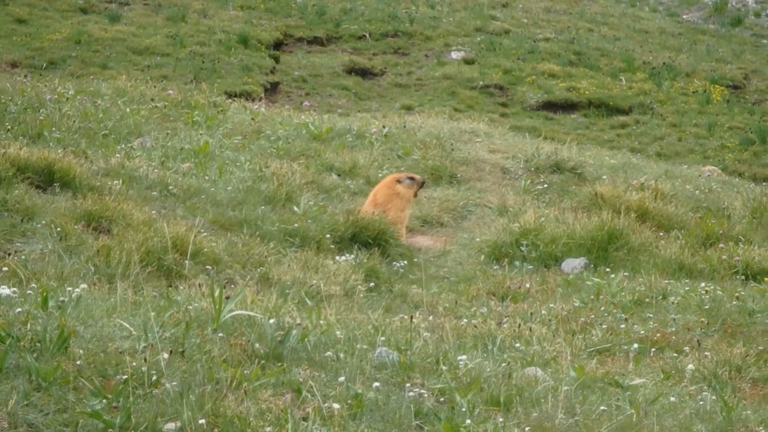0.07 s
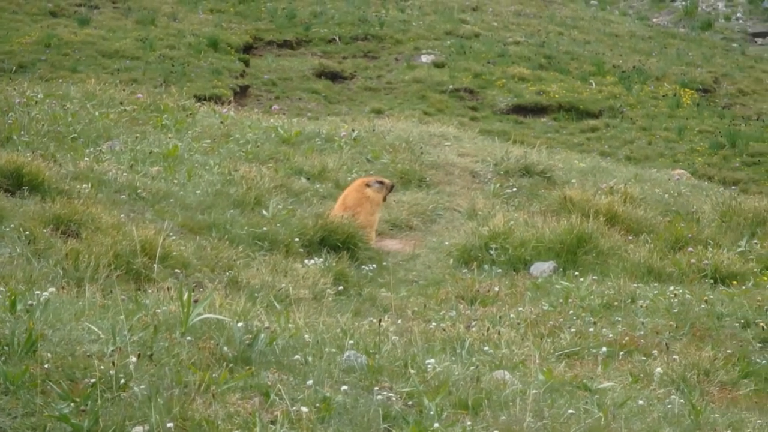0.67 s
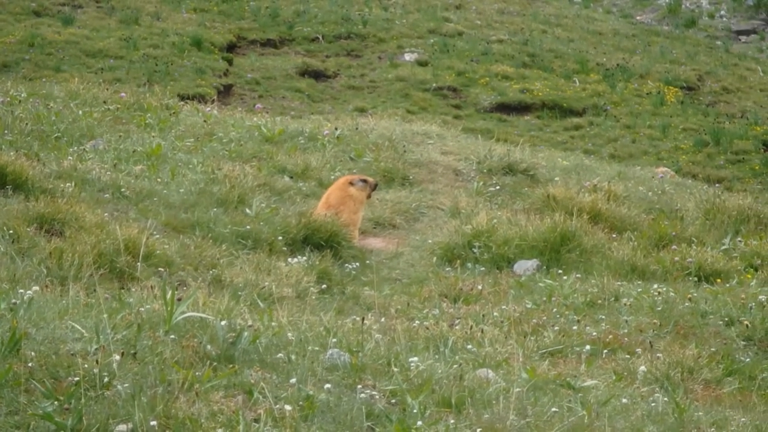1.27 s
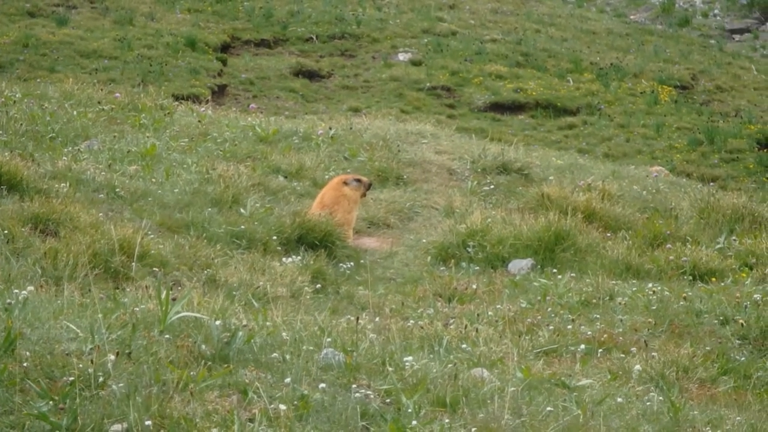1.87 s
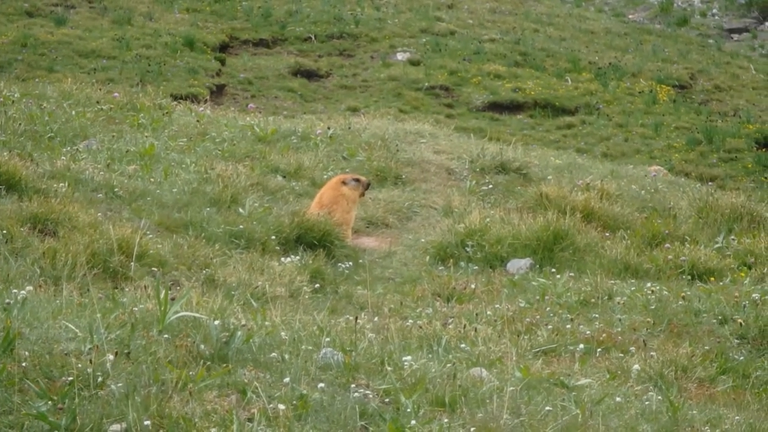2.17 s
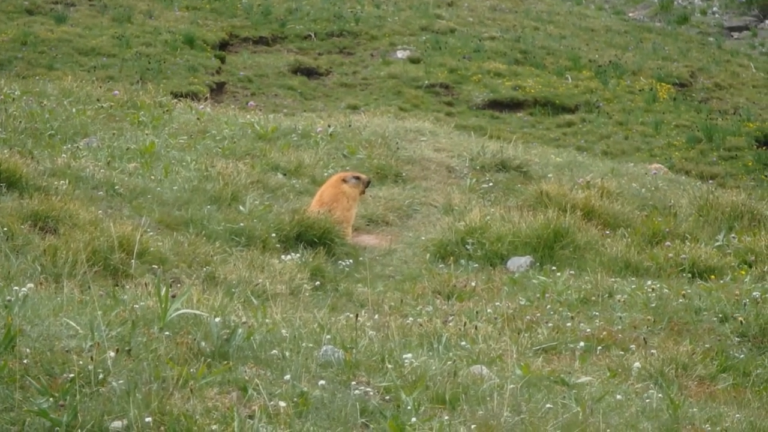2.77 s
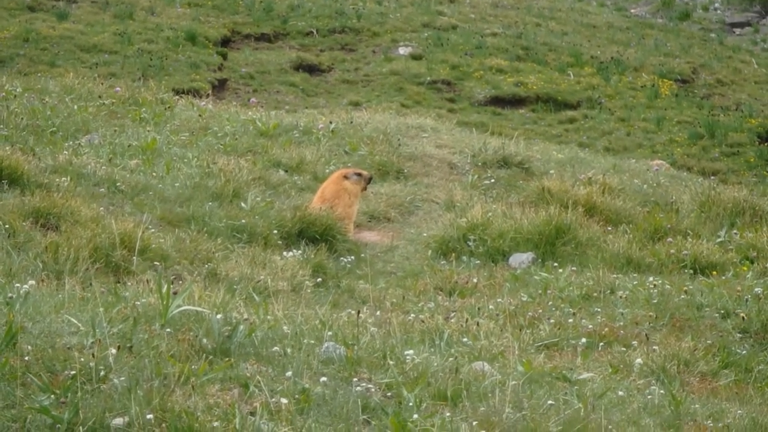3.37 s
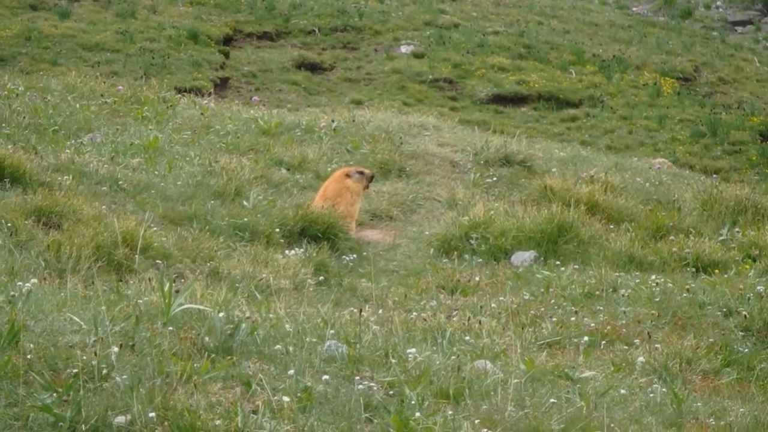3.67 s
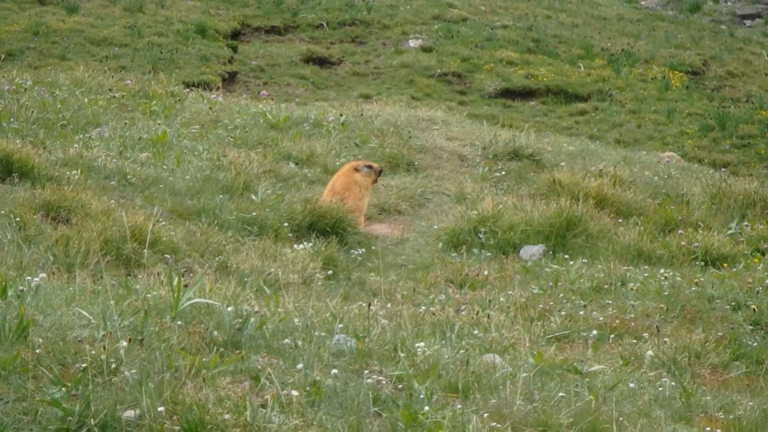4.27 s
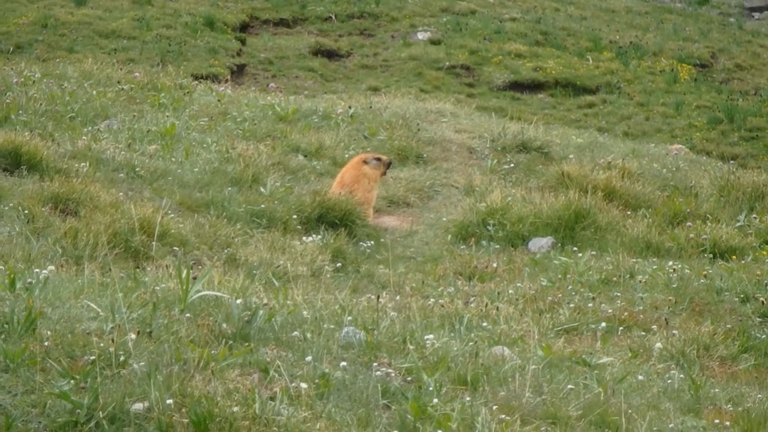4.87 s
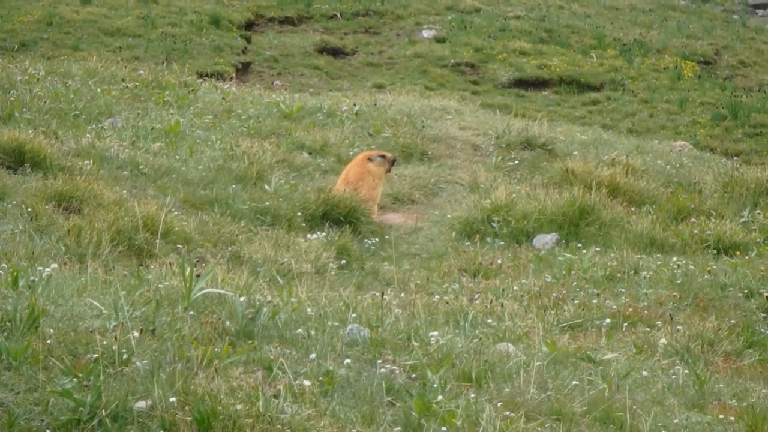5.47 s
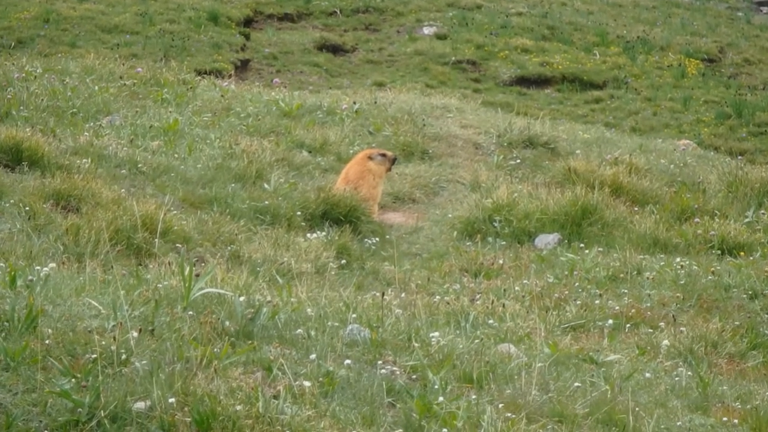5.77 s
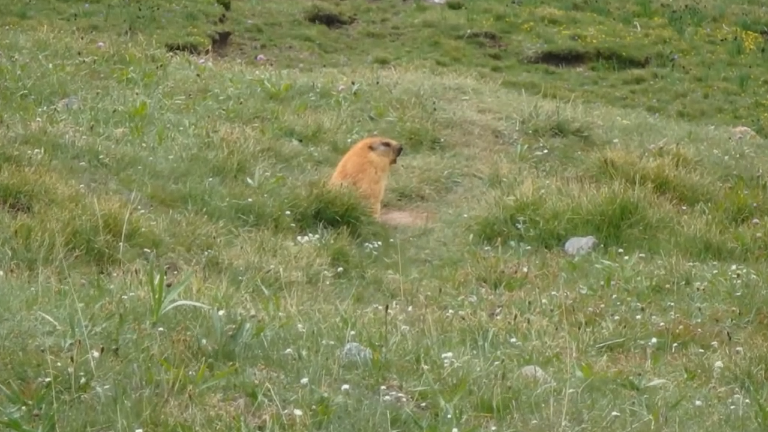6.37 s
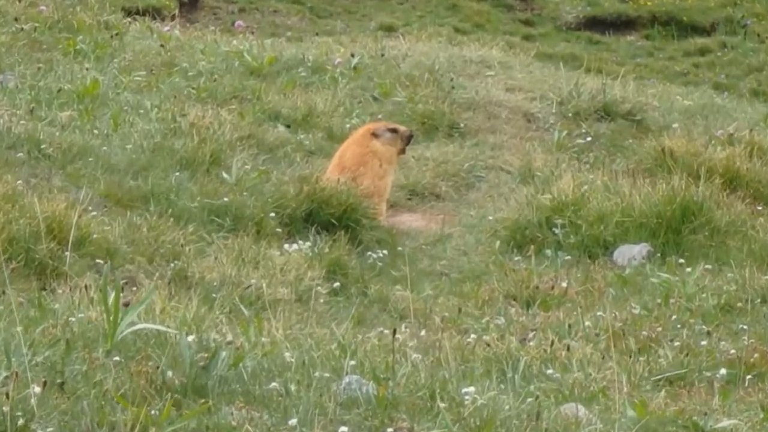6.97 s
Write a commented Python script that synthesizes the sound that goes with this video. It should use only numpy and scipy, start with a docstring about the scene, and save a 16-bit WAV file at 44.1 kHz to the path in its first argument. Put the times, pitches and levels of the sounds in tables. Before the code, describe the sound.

On an open mountain meadow, a marmot gives three loud, short alarm whistles about half a second apart, each trilled and falling, with no echo. A distant stream and a breeze then swell up from a low level. Gusts rumble and thump on the faintly hissing microphone of a small camera. Later, fingers click briefly on the case, and a far bird chirps once, very faintly.

```python
"""An open alpine meadow: a marmot gives three falling, trilled alarm whistles while a stream rushes far off.
The whistles duck a small camera's gain control, so stream and wind swell back over two seconds.
Gusts buffet the hissing microphone, the focus motor whines in short runs, fingers click on the case
and a small bird chirps once."""
import sys
import numpy as np
from scipy import signal
from scipy.fft import rfft, irfft, next_fast_len
from scipy.io import wavfile
from scipy.ndimage import uniform_filter1d, minimum_filter1d, map_coordinates

SR = 44100
rng = np.random.default_rng(int(sys.argv[2]) if len(sys.argv) > 2 else 0)


def dump(signal):
    """Clip the signal to [-1, 1] and save it as 16-bit WAV at the path in sys.argv[1]."""
    limited = np.clip(np.atleast_2d(signal).T, -1, 1)
    pcm = np.round(limited * 32767).astype(np.int16)
    wavfile.write(sys.argv[1], SR, pcm)


N = 314433
T = np.arange(N) / SR


def undb(db):
    """Decibels to gain."""
    return 10 ** (np.asarray(db) / 20)


def unit(x):
    """Scale to rms 1."""
    return x / np.sqrt(np.mean(x ** 2))


def response(curve, hz):
    """Gain of an EQ curve (f/Hz, level/dB) at the given frequencies."""
    f, db = np.transpose(curve)
    return undb(np.interp(np.log(np.maximum(hz, 1)), np.log(f), db))


def noise(curve):
    """Noise of rms 1, coloured by an EQ curve."""
    size = next_fast_len(N)
    spectrum = rfft(rng.standard_normal(size)) * response(curve, np.fft.rfftfreq(size, 1 / SR))
    return unit(irfft(spectrum, size)[:N])


def wander(rate_hz):
    """Smooth random modulation of rms 1."""
    step = max(int(SR / rate_hz), 2)
    return unit(uniform_filter1d(np.repeat(rng.standard_normal(N // step + 1), step), step)[:N])


def swell(peak_s, half_s):
    """A bell-shaped envelope of height 1."""
    return np.exp(-((T - peak_s) / half_s) ** 2 / 2)


def place(x, pan_db, lag=0):
    """Pan across the two microphone ports: left minus right in dB, the right late by lag samples."""
    late = map_coordinates(x, [np.arange(N) - lag], order=3)
    return np.array([x * undb(pan_db / 2), late * undb(-pan_db / 2)])


def call_contour(age, left_s, top_hz, sink_hz_per_s, drop_hz, sag_hz):
    """The marmot's voice starts high and hard, sinks, breaks to a lower register and runs out of breath."""
    hold_s, floor_hz = .016, 1850
    break_s, break_width_s = .056, .0051
    fade_s, fade_db = .019, -10.5
    hard_dip, soft_dip, dip_growth_per_s = .28, .087, 1.3  # pitch dip between beats, as a share
    broken = (1 + np.tanh((age - break_s) / (2 * break_width_s))) / 2
    spent = np.clip(1 - left_s / fade_s, 0, 1)
    sunk_hz = top_hz - sink_hz_per_s * np.maximum(age - hold_s, 0) - drop_hz * broken
    crest_hz = np.maximum(sunk_hz, floor_hz) - sag_hz * spent
    dip = hard_dip * (1 - broken) + soft_dip * broken + dip_growth_per_s * np.maximum(age - break_s, 0)
    return crest_hz, fade_db * spent, dip


def whistle(start, end, trill_hz, slowing, voicing):
    """A falling whistle chopped by a slowing trill; pitch and loudness arch in every beat."""
    # resonances of throat and mouth: f/Hz, gain/dB
    throat = [(1700, -28), (1950, -20.5), (2100, -13.5), (2250, -8), (2450, -6.5), (2900, 1), (3550, -4),
              (4000, -5), (4300, -7.5), (4700, -19), (5400, -11), (5900, -7), (6600, -17.5), (9000, -19)]
    note_s, attack_s, release_s = .0135, .0032, .0015
    lean, skew, jitter = .23, .033, .049
    harmonics_db, grain, rasp_db = [0, -14, -26], .14, -53
    age = np.clip(T - start, 0, end - start)
    crest_hz, effort_db, dip = call_contour(age, end - start - age, *voicing)
    beat = np.log1p(slowing * trill_hz * age) / slowing % 1
    beat_s = 1 / trill_hz + slowing * age
    # a note lasts at most note_s, so gaps open as the trill slows
    swing = np.clip((2 * beat - 1) * np.maximum(beat_s / note_s, 1), -1, 1)
    # deep beats sweep wide, crest late and are rough; shallow ones are smooth and sag
    hz = crest_hz * (1 - dip * swing ** 2 + (lean * dip - skew) * swing + jitter * dip * wander(1200))
    phase = 2 * np.pi * np.cumsum(hz) / SR
    gate = np.clip(np.minimum((T - start - .002) / attack_s, (end - T) / release_s), 0, 1)
    opening = np.abs(np.cos(np.pi / 2 * swing)) ** .88 * gate
    # harmonics bloom with the opening and slide through the resonances: the second gains as pitch sinks
    tone = 0
    for k, db in enumerate(harmonics_db, 1):
        roughness = grain * (k - 1) * wander(2000)
        envelope = undb(db) * opening ** np.sqrt(k) * response(throat, k * hz)
        tone = tone + envelope * np.sin(k * phase + roughness)
    rasp = undb(rasp_db) * opening * np.sqrt(response(throat, hz)) * rng.standard_normal(N)
    return (np.sqrt(2) * tone + rasp) * undb(effort_db + .5 * wander(300))


def marmot(level_db=7):
    """Three alarm whistles from near the centre; the open slope gives no echo."""
    # calls: start/s, end/s, opening trill rate/Hz, lengthening per beat/share,
    # opening pitch/Hz, sink/(Hz/s), drop at the voice break/Hz, final sag/Hz
    whistles = [(-.0125, 0.125, 96.9, .04, 2950, 5100, 249, 280),
                (.444, 0.611, 96.7, 0.048, 3037, 4230, 467, 20),
                (0.933, 1.118, 98, .05, 3040, 5320, 443, 50)]
    calls = sum(whistle(start, end, trill_hz, slowing, voicing)
                for start, end, trill_hz, slowing, *voicing in whistles)
    return place(calls * undb(level_db), pan_db=-3, lag=.78)


def wind(rumble_share=.48, flutter_share=.62, eddy_db=2):
    """Gusts swell out of a light breeze; eddies hit both ports partly together, and hard ones thump."""
    # deep rumble of air on the microphone: f/Hz, level/dB
    rumble_eq = [(12, -19), (22, 0), (45, 2.5), (85, 6), (125, 1.5), (170, -7.5), (300, -45), (1500, -100)]
    # low-mid flutter of the eddies: f/Hz, level/dB
    flutter_eq = [(40, -41), (90, -18.5), (140, 0), (180, 0.5), (240, -3.5), (320, -10.5), (450, -22),
                  (700, -33.5), (4000, -91)]
    # gusts: t/s, half length/s, rumble/dB, flutter/dB
    gusts = [(0.687, 0.02, -16.5, -29), (0.768, 0.042, -18.5, -23), (1.27, 0.11, -26.5, -28),
             (2.31, .04, -18, -22), (2.443, 0.043, -21, -19.5), (2.67, 0.088, -19, -31),
             (2.897, 0.049, -20.5, -49), (3.166, 0.042, -24, -36), (3.36, 0.024, -26, -33),
             (3.718, 0.075, -22.5, -25), (4.103, 0.016, -19.5, -33), (4.366, 0.061, -21, -33),
             (4.68, 0.063, -15.5, -17.5), (4.816, 0.05, -19, -23.5), (4.97, 0.093, -24, -53),
             (6.21, 0.06, -23, -24), (6.415, 0.018, -24, -30.5)]
    # single hard eddies: t/s, half length/s, level/dB, f/Hz
    buffets = [(0.735, 0.015, -16, 342), (2.308, 0.0099, -16.5, 262), (2.346, 0.0097, -23, 345),
               (2.454, 0.0069, -29, 226), (3.7, 0.0089, -18.5, 200), (4.65, 0.0044, -16.5, 281),
               (4.69, 0.0097, -9, 183), (4.762, 0.007, -18.5, 320), (4.822, 0.0075, -9.5, 210)]
    breeze = undb(1.5 * wander(6.6))
    rumble, flutter = breeze * undb(-29.5), breeze * undb(-32)
    for peak_s, half_s, rumble_db, flutter_db in gusts:
        gust = swell(peak_s, half_s)
        rumble = np.hypot(rumble, undb(rumble_db) * gust)
        flutter = np.hypot(flutter, undb(flutter_db) * gust)
    out = 0
    for envelope, eq, share in [(rumble, rumble_eq, rumble_share), (flutter, flutter_eq, flutter_share)]:
        ports = np.sqrt(share) * noise(eq) + np.sqrt(1 - share) * np.array([noise(eq), noise(eq)])
        out = out + unit(ports * undb(eddy_db * wander(45))) * envelope
    for peak_s, half_s, db, hz in buffets:
        band = signal.butter(2, [hz / 1.62, hz * 1.28], "band", fs=SR, output="sos")
        both, left, right = signal.sosfilt(band, rng.standard_normal((3, N)))
        out = out + undb(db) * swell(peak_s, half_s) * unit(both + 1.45 * np.array([left, right]))
    return out * undb([[-2.8], [1.5]])  # heavier on the right


def stream(level_db=-35, diffuse_db=-13):
    """A gently wavering bed of far water, a little to the right, with a diffuse wash around it."""
    # rushing water at a distance: f/Hz, level/dB
    water_eq = [(150, -8), (480, -5), (680, 0), (880, -0.5), (1120, -5.5), (1600, -5), (2000, -8.5),
                (2750, -8.5), (3400, -12.5), (4200, -8.5), (4620, -28.5), (5500, -24.5), (7500, -32),
                (11000, -49.5)]
    direct = place(noise(water_eq), pan_db=-5.5, lag=.34)
    wash = undb(diffuse_db) * np.array([noise(water_eq), noise(water_eq)])
    return (direct + wash) * undb(level_db + 1.17 * wander(6))


def microphone_hiss(level_db=-48.5, opposed=.13):
    """The microphone's own noise, partly out of phase between the channels."""
    # noise floor: f/Hz, level/dB
    hiss_eq = [(3000, 7.5), (7000, -2.5), (9000, -2.5), (11500, 4), (13000, 1.5), (15000, 1.5)]
    hiss = np.array([noise(hiss_eq), noise(hiss_eq)])
    return undb(level_db) * (hiss - opposed * hiss[::-1])


def focus_motor(level_db=-61, whine_hz=11000, run_s=.13, every_s=.173, ramp_s=.0037):
    """The focus motor spins in short runs, each a thin, steady whine."""
    # motor bursts: t/s, number of runs
    bursts = [(.22, 3), (1.1, 1), (1.57, 3), (2.27, 2), (2.91, 3), (3.73, 1), (4.14, 5), (5.24, 1),
              (5.65, 1), (6.125, 1), (6.595, 1), (7.07, 1)]
    starts = [start + k * every_s for start, runs in bursts for k in range(round(runs))]
    running = sum(np.clip(np.minimum(T - s, s + run_s - T) / ramp_s, 0, 1) for s in starts)
    return undb(level_db) * np.sqrt(2) * running * np.sin(2 * np.pi * whine_hz * T)


def finger_clicks(width=.45, snap=1.2, grit_db=-.5):
    """Each touch snaps, then slips grittily, ringing the camera case nearer the right port."""
    # touches: t/s, level over 4 ms/dB, decay/s, brightness/(dB/octave)
    touches = [(5.134, -39, 0.0019, 2), (5.142, -36, .002, 3), (5.151, -29.5, 0.0023, 1),
               (5.1667, -24, 0.0022, -1), (5.173, -25.5, 0.00095, 2), (5.2094, -11.5, 0.0021, -6),
               (5.2405, -29, 0.0035, -7), (5.248, -24, 0.0035, 14), (5.2522, -24.5, 0.0076, 14),
               (5.2753, -21, 0.0046, 16), (5.279, -21.5, 0.002, -10), (5.414, -32, 0.0034, 2),
               (5.47, -34, .004, 1)]
    # modes of the case: f/Hz, width/Hz, level/dB
    modes = [(1700, 450, -16), (2860, 180, 5), (2940, 164, 2), (4050, 260, -5), (5050, 440, -12),
             (5930, 690, -8.5), (6900, 640, -14), (11500, 3100, -37)]
    age = np.arange(SR // 20) / SR

    def ring():
        """One mono layer of all the touches, with fresh grit."""
        out = np.zeros(N)
        for start, db, decay_s, tilt in touches:
            grit, grain_size = rng.standard_normal((2, len(age)))
            force = grit * undb(grit_db * grain_size) * np.exp(-age / decay_s) + snap * (age == 0)
            click = 0
            for hz, width_hz, mode_db in modes:
                ringing = signal.lfilter(*signal.iirpeak(hz, hz / width_hz, fs=SR), force)
                click = click + undb(mode_db + tilt * np.log2(hz / 4000)) * ringing
            click = click / np.sqrt(np.sum(click ** 2) / (.004 * SR))
            onset = int(start * SR)
            out[onset:onset + len(age)] += undb(db) * click
        return out
    return place(ring(), pan_db=-8, lag=1.65) + width * np.array([ring(), ring()])


def bird(waver=.0064):
    """A far bird's single chirp: two thin, overlapping down-slurs."""
    # slurs: t/s, length/s, from/Hz, to/Hz, level/dB
    slurs = [(6.09, .08, 5400, 4500, -52), (6.108, .066, 5950, 5100, -55)]
    out = np.zeros(N)
    for start, length, from_hz, to_hz, db in slurs:
        progress = np.clip((T - start) / length, 0, 1)
        hz = (from_hz + (to_hz - from_hz) * progress) * (1 + waver * wander(400))
        out += undb(db) * np.sqrt(2) * np.sin(np.pi * progress) * np.sin(2 * np.pi * np.cumsum(hz) / SR)
    return place(out, pan_db=-2)


def scene():
    """The meadow and the camera's own noises, mixed in stereo."""
    return marmot() + wind() + stream() + bird() + finger_clicks() + microphone_hiss() + focus_motor()


def gain_control(x, threshold_db=-16, attack_s=.0007, hold_s=.15, release_db_per_s=12, start_cut_db=24):
    """Ducks fast on loud sounds, holds, then creeps back up; it starts out already ducked."""
    sidechain = signal.sosfilt(signal.butter(1, 300, "high", fs=SR, output="sos"), x)
    power = np.maximum(uniform_filter1d(np.mean(sidechain ** 2, axis=0), size=132), 1e-12)
    over_db = np.maximum(10 * np.log10(power) - threshold_db, 0)
    over_db[0] = start_cut_db
    hold = int(hold_s * SR) // 2 * 2 + 1
    held_db = -minimum_filter1d(-over_db, hold, origin=hold // 2)
    cut_db = np.maximum.accumulate(held_db + release_db_per_s * T) - release_db_per_s * T
    # the gain takes a moment to fall, so the front of a click slips through
    pole = np.exp(-1 / (attack_s * SR))
    cut_db = start_cut_db + signal.lfilter([1 - pole], [1, -pole], cut_db - start_cut_db)
    return x * undb(-cut_db)


def record(dry):
    """The camera's chain: gain control, narrow notches and a steep treble cut-off."""
    # notches against the camera's motor noise: f/Hz, width/Hz
    notches = [(2045, 104), (3065, 200), (4100, 65), (5120, 17), (6140, 310), (7000, 28), (8000, 65),
               (9000, 75)]
    cutoff_hz = 15150
    y = gain_control(dry)
    for hz, width_hz in notches:
        y = signal.lfilter(*signal.iirnotch(hz, hz / width_hz, fs=SR), y)
    return signal.sosfilt(signal.ellip(8, .2, 70, cutoff_hz, fs=SR, output="sos"), y)


dry = scene()
out = record(dry)
dump(out)
```